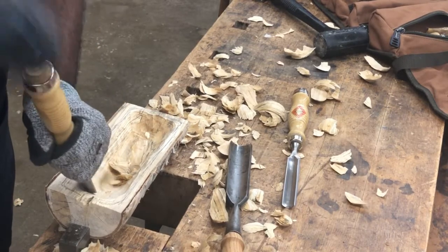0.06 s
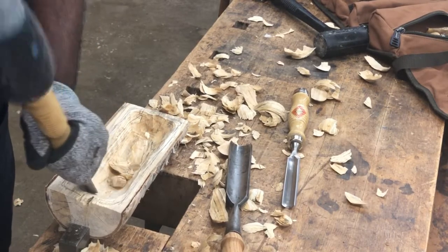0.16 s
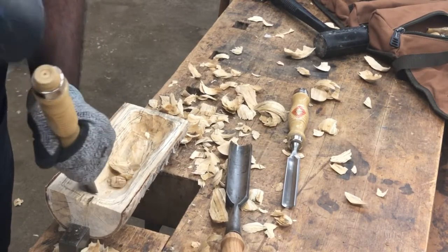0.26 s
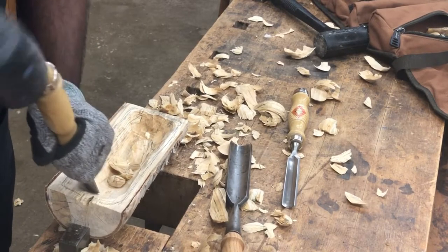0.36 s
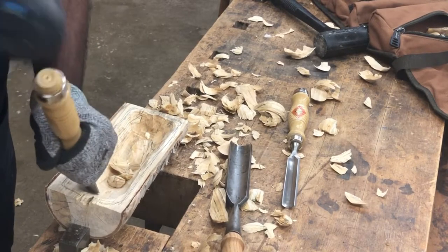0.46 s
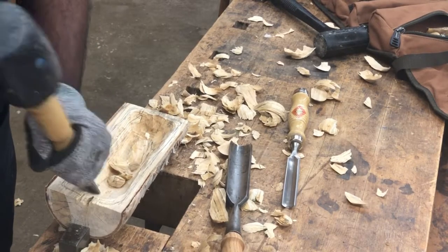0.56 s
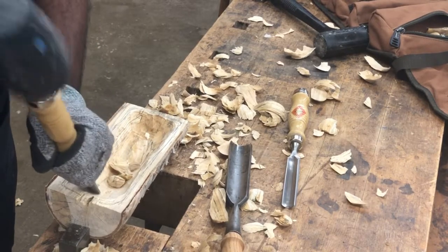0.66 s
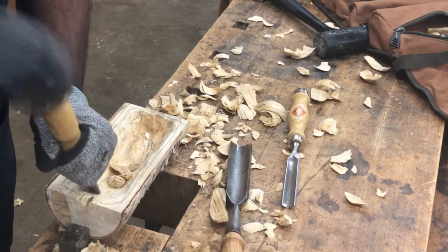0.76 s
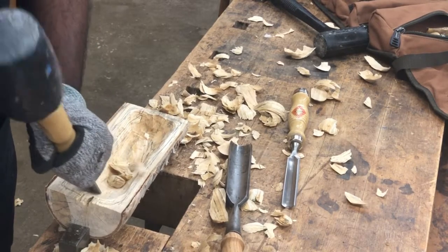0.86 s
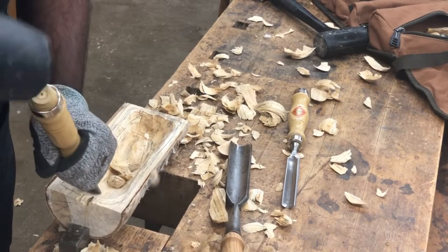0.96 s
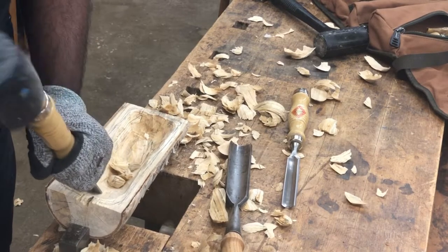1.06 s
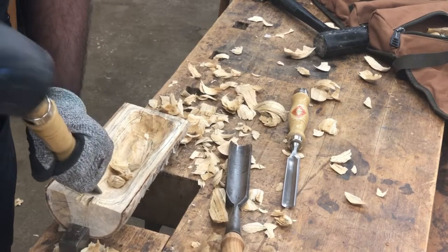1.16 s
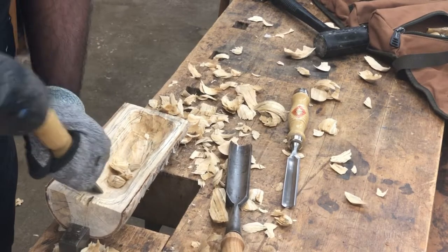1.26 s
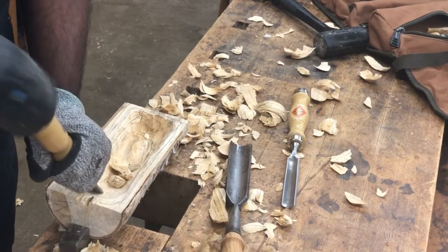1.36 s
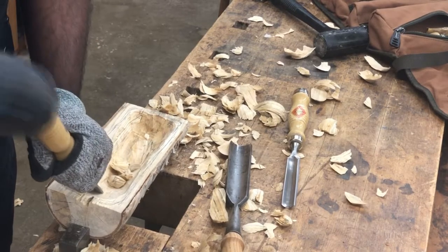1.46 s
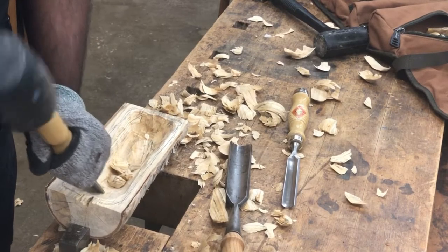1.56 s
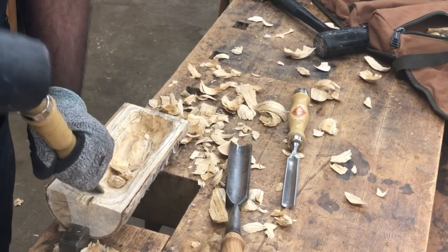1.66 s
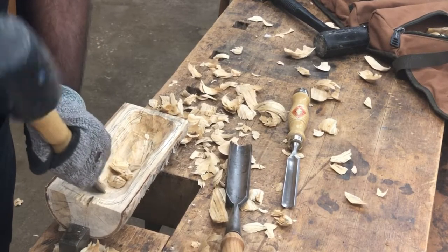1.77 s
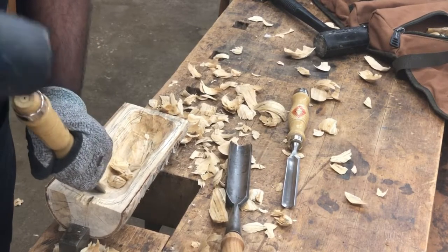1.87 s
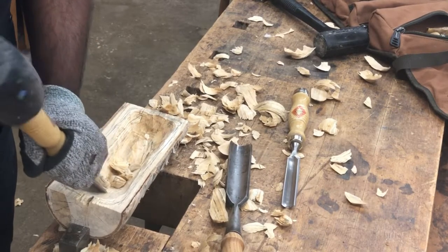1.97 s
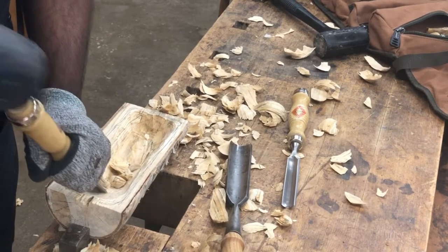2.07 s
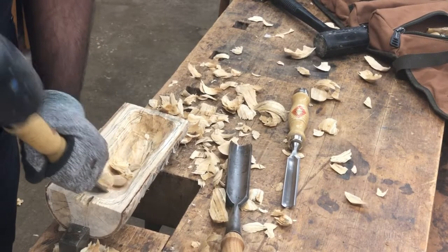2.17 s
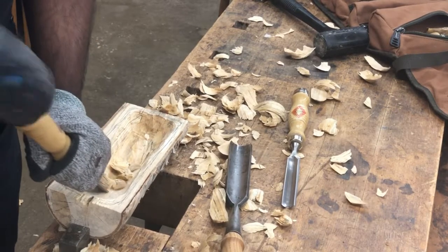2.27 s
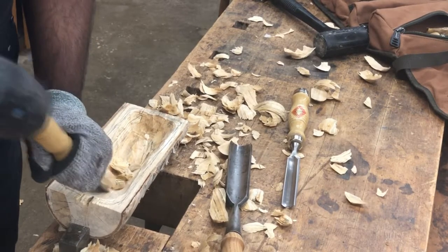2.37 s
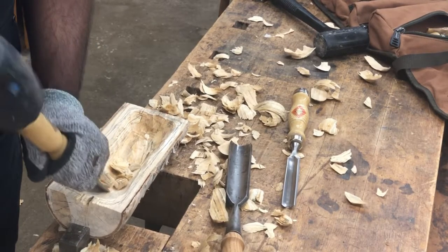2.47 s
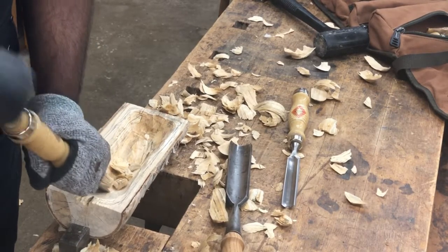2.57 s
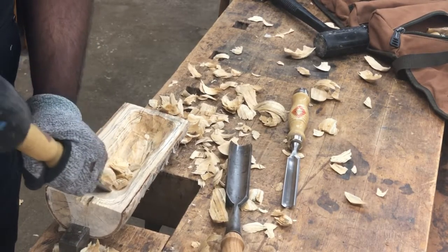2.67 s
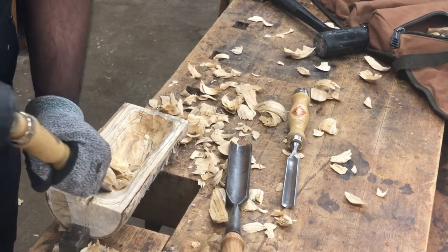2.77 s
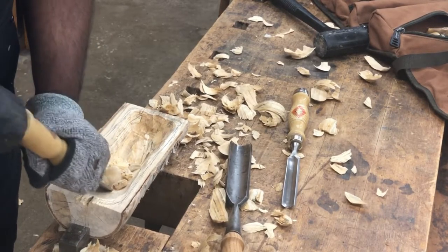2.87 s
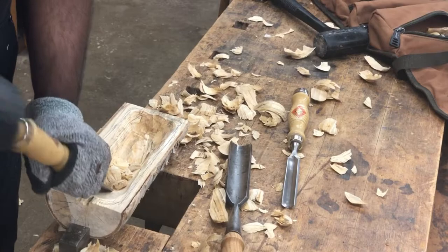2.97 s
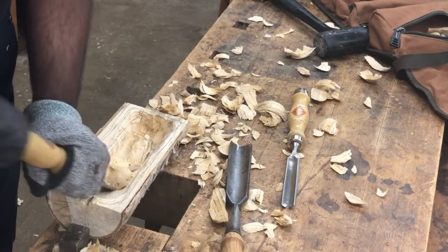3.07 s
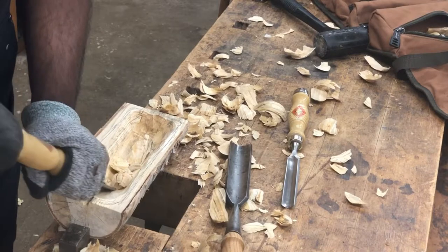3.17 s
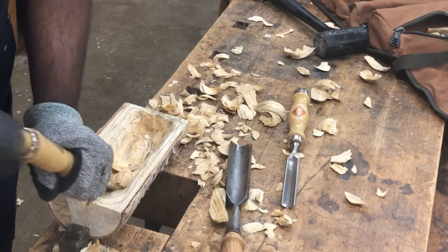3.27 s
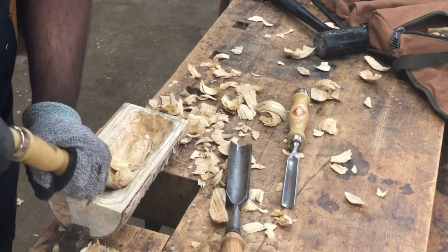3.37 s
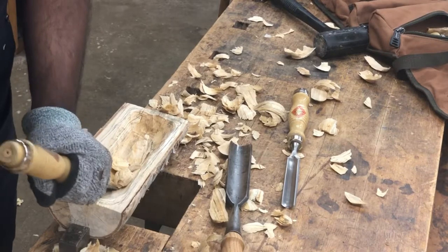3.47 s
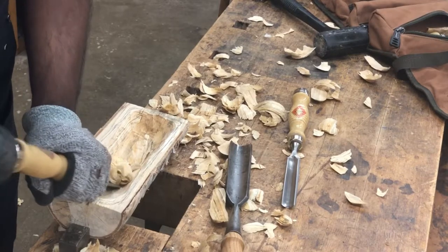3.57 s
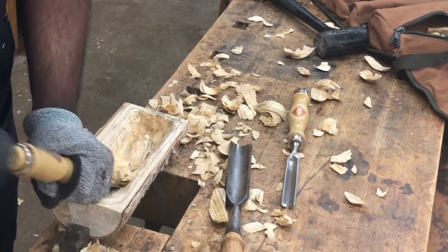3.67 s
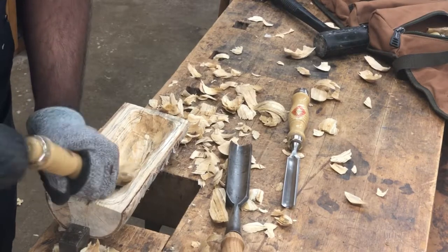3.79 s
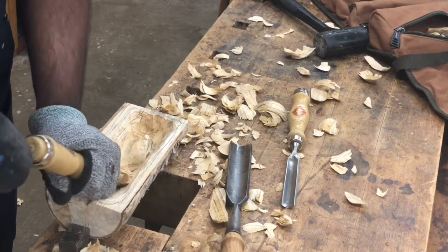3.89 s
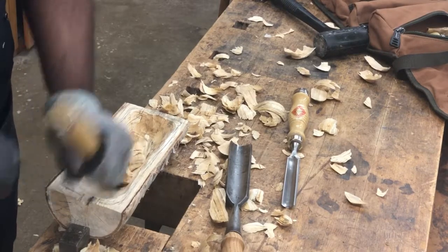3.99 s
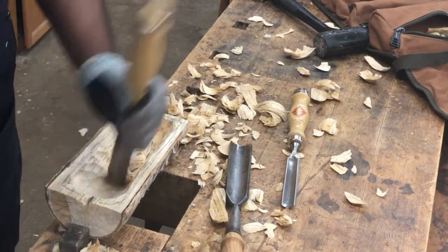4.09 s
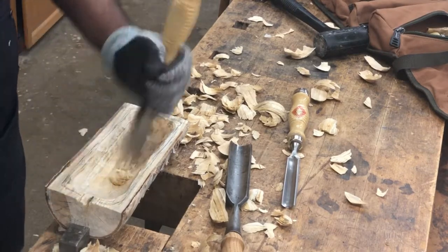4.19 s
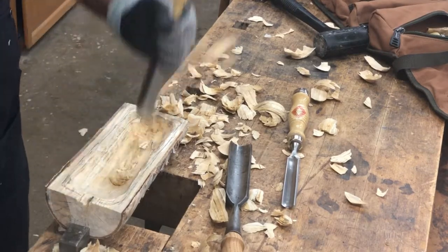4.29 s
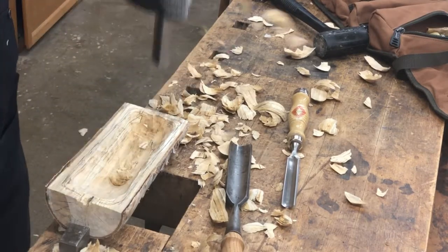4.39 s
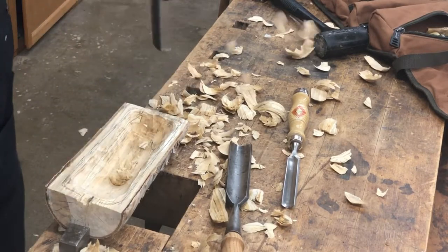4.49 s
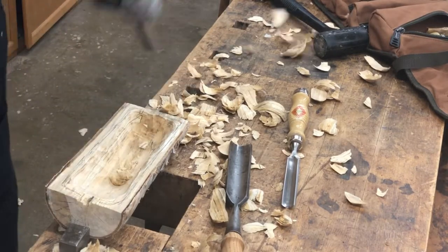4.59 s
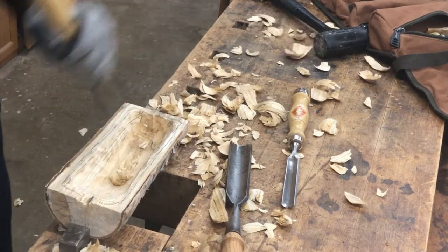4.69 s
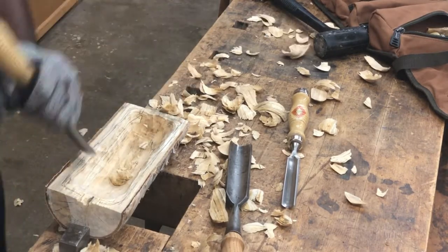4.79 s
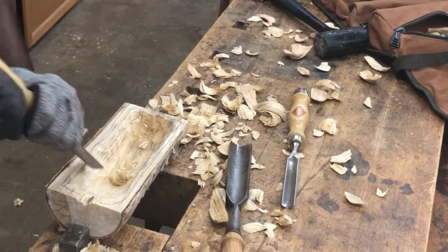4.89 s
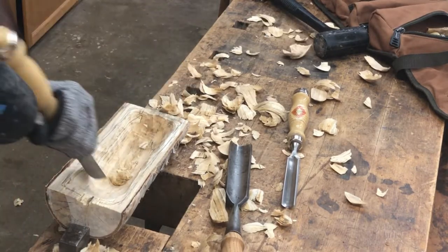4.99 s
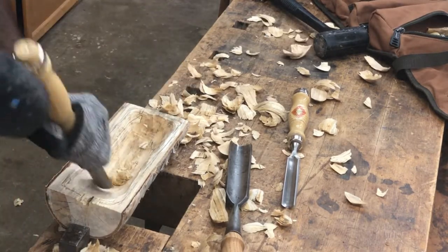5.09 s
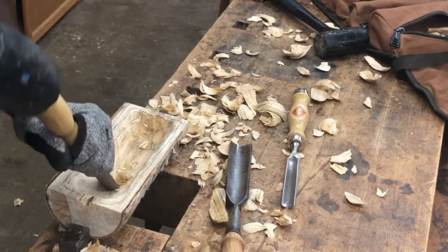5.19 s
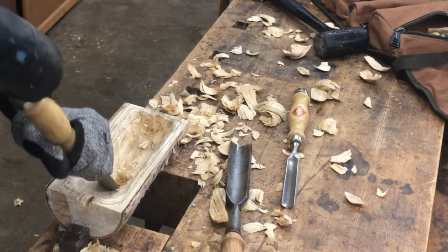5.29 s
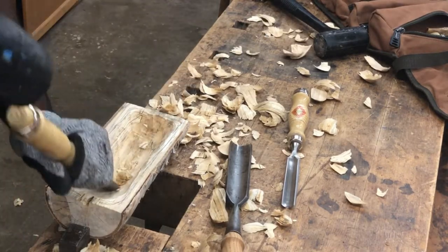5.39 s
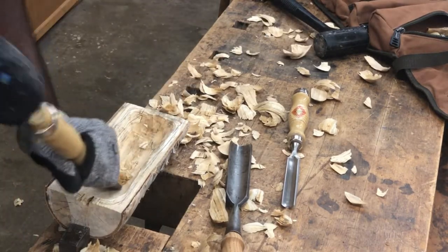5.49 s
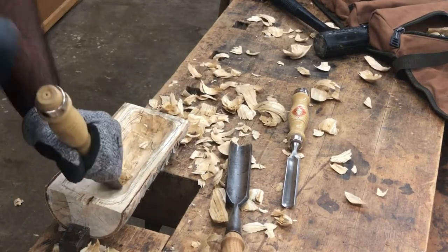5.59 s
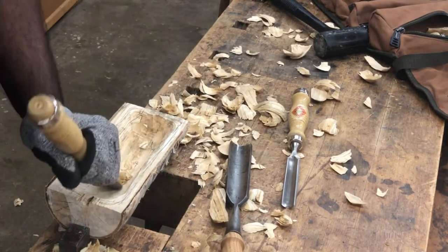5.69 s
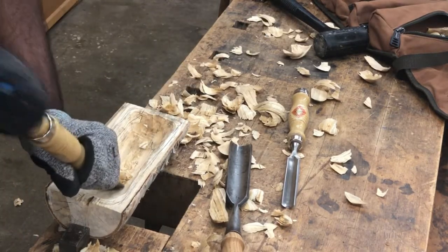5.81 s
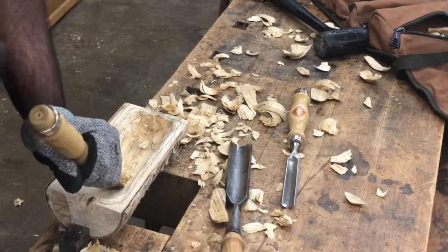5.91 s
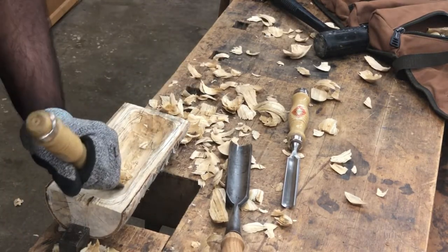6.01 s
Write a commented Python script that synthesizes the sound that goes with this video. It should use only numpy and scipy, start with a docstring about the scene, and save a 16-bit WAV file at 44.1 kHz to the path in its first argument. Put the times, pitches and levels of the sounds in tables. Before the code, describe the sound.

Hard, dry wood knocks in a steady fast run, each with a clattering bench thud, then splintering wood, small patters and a single softer tap.

```python
"""Gouging a log on a workbench

A mallet drives a wooden-handled gouge into a half-hollowed log, about four blows a second.
Each blow rings handle, log and steel modes; the log hops and lands (modes plus noise bands), the bench booms.
Then noise crackle tears a chip loose and flicks it away, the gouge is set again, one lighter blow follows.
Filtered noise and hum form the workshop's air, decaying noise its echo; faint high tones waver above."""
import sys
import numpy as np
from scipy import signal
from scipy.fft import rfft, irfft
from scipy.io import wavfile

SR = 44100
rng = np.random.default_rng(int(sys.argv[2]) if len(sys.argv) > 2 else 0)


def store_wav(level_fs):
    """Save 16-bit WAV to argv[1]."""
    pcm = np.round(np.clip(np.atleast_2d(level_fs), -1, 1) * 32767)
    wavfile.write(sys.argv[1], SR, pcm.T.astype(np.int16))


N = 266805
T = np.arange(int(0.45 * SR)) / SR  # s, longest single sound


def undb(db):
    """Decibels to gain."""
    return 10 ** (np.asarray(db) / 20)


def rms(x, size):
    """RMS of the first samples."""
    return np.sqrt(np.mean(x[:size] ** 2))


def level(x, size):
    """Scale to RMS 1 over the first samples."""
    return x / rms(x, size)


def add(track, start_s, x):
    """Mix a sound into the track, cut at both ends of the track."""
    i = int(round(start_s * SR))
    x = x[max(-i, 0):max(N - i, 0)]
    track[max(i, 0):max(i, 0) + len(x)] += x


def fade(t60_s):
    """Exponential decay, 60 dB in t60_s."""
    return np.exp(-np.log(1000) * T / t60_s)


def ring(modes, tune=1.0, rise_cycles=0.12, size=len(T)):
    """Decaying sine modes; each needs some cycles to build up."""
    t = T[:size]
    out = 0
    for hz, db, t60_s in modes:
        decay = undb(db - 60 * t / t60_s)
        rise = -np.expm1(-t * hz / rise_cycles)
        out = out + decay * rise * np.sin(2 * np.pi * hz * tune * t)
    return out


def regrip(modes, spread, scatter_db):
    """Grip and contact point change from blow to blow, and with them mode pitches and levels."""
    chance = rng.standard_normal((len(modes), 2))
    return [(hz * (1 + spread * a), db + scatter_db * b, t60_s)
            for (hz, db, t60_s), (a, b) in zip(modes, chance)]


def dense(table, size=len(T)):
    """Countless overlapping modes: third-octave noise bands, each with its own energy and decay."""
    hz, db, t60_s = np.transpose(table)
    log_hz = np.log(hz)
    out = 0
    for centre_hz in 40 * 2 ** (np.arange(27) / 3):
        log_centre = np.log(centre_hz)
        b, a = signal.iirpeak(centre_hz, 2.8, fs=SR)
        decay = fade(np.interp(log_centre, log_hz, t60_s))[:size]
        excitation = rng.standard_normal(size) * decay
        band = signal.lfilter(b, a, signal.lfilter(b, a, excitation))
        bass_rolloff = min(centre_hz / hz[0], 1) ** 2
        gain = undb(np.interp(log_centre, log_hz, db)) * bass_rolloff
        # band energy ~ bandwidth, so table levels are per Hz
        out = out + band * gain * np.sqrt(centre_hz / np.sum(band ** 2))
    return out * np.minimum(np.linspace(10, 0, size), 1)  # fade the last tenth


# steady air spectrum: f/Hz, relative level/dB per Hz
AIR = [(20, -35), (50, 3.5), (140, -2), (250, 0), (450, -1.5), (620, -9.5), (930, -16), (1080, -12.5),
       (1600, -14.5), (2300, -20.5), (4000, -25), (7000, -35), (11000, -40.5), (15000, -38)]
# machine hum: f/Hz, RMS level/dB
HUM = [(419.9, -61), (748.3, -65.5)]
AIR_DB = -51


def air():
    """Steady workshop rumble from shaped noise, with faint machine-hum sines."""
    t, f = np.arange(N) / SR, np.fft.rfftfreq(N, 1 / SR)
    hz, db = np.transpose(AIR)
    spectrum = undb(np.interp(np.log(f + 1), np.log(hz), db))
    noise = irfft(rfft(rng.standard_normal(N)) * spectrum, N)
    hum = 0
    for hum_hz, hum_db in HUM:
        hum = hum + undb(hum_db) * np.sqrt(2) * np.sin(2 * np.pi * (hum_hz * t + rng.random()))
    return undb(AIR_DB) * level(noise, size=N) + hum


# gouge handle, before tuning to the blow: f/Hz, relative level/dB, t60/s
KNOCK_MODES = [(1105, 11, 0.017), (1230, -17, 0.03), (1450, 3.5, 0.014)]
# log, struck or landing: f/Hz, relative level/dB, t60/s
LOG_MODES = [(202, -15, 0.087), (303, -3, 0.028), (486, -1.5, 0.04), (626, 4.5, 0.028), (725, -18, 0.081),
             (830, -14.5, 0.05)]
# gouge steel, damped by wood and glove: f/Hz, relative level/dB, t60/s
STEEL_MODES = [(1800, 0, 0.019), (1936, 12.5, 0.0097), (2200, 16.5, 0.013), (2882, 4, 0.014),
               (3437, 8, 0.014), (3634, 4, 0.022), (4210, -21.5, 0.079), (4970, -3, 0.014),
               (6730, -16, 0.035), (7750, -6, 0.013), (7260, -17, 0.059)]
# mallet contact, noise bands: f/Hz, relative level/dB per Hz, t60/s
SNAP = [(795, -29, .012), (1930, 10, 0.026), (3480, 10.5, 0.003), (5070, -2.5, 0.041), (7350, 6, 0.004),
        (11200, -3, 0.017), (16100, -14.5, 0.011)]
KNOCK_HZ = 1075  # blow pitch that leaves the handle modes untuned
PUSH_S = 0.002392  # first touch to full push


def strike(knock_db, hz, ping_db, snap_db, size=3072):
    """The mallet ticks on the handle; a moment later its full weight drives the edge into the wood."""
    out, push = np.zeros(size), int(PUSH_S * SR)
    handle_modes = regrip(KNOCK_MODES, spread=0.0024, scatter_db=2.5)
    handle = ring(handle_modes, hz / KNOCK_HZ, rise_cycles=7.4, size=size - push // 4)
    log = ring(regrip(LOG_MODES, spread=0.017, scatter_db=9.0), rise_cycles=0.31, size=size - push)
    steel = ring(regrip(STEEL_MODES, spread=0.021, scatter_db=3.0), rise_cycles=7.6, size=size)
    tick = dense(SNAP, size=size) * fade(0.0059)[:size]
    bite = dense(SNAP, size=size) * -np.expm1(-T[:size] / 0.0013)
    bite = bite[:size - push // 2]
    out[push // 4:] -= undb(knock_db - 7.0) * level(handle, size=350)
    out[push:] += undb(knock_db - 4.5) * level(log, size=350)
    out += undb(ping_db) * level(steel, size=350)
    out += undb(snap_db) * level(tick, size=350)
    out[push // 2:] += undb(snap_db + 3.5) * level(bite, size=350)
    return out


# room echo, noise bands: f/Hz, relative level/dB per Hz, t60/s
ECHO = [(60, -17.0, 0.39), (268, -1.5, 0.56), (1010, -3, 0.36), (4030, -8, 0.42),
        (9000, -7, 0.27), (16200, -6.5, 0.064)]


def workshop(x):
    """Diffuse echo of walls and floor, building up a little after the direct sound."""
    echo = dense(ECHO) * -np.expm1(-T / 0.0031)
    return signal.fftconvolve(x, echo / np.sqrt(np.sum(echo ** 2)))[:N]


# workbench, before swell: f/Hz, relative level/dB, t60/s
BENCH_MODES = [(79.2, -34, 0.5), (105, 1.8, 0.14), (134.5, -12.5, 0.2), (183.1, -1.5, 0.2),
               (215.2, -15.5, 0.24), (234.6, -15.5, 0.28), (287.7, -5.5, 0.17), (308.7, -23.5, 0.32),
               (343, -7.5, 0.2), (371.5, -9.5, 0.18), (404, -9, 0.14), (448, -16, 0.22),
               (488.7, -12.5, 0.18), (525, -11.5, 0.16), (637, -11, 0.085), (693, -13, 0.14),
               (746, -13, 0.18), (944, -23, 0.13)]
# bench drumming as the gouge works along the log: t/s, gain at DRUM_HZ/dB
DRUMMING = [(0.06, 0), (0.55, 5.5), (1.7, 4.5), (2.15, -2), (3.8, -3.5), (5.76, -4)]
DRUM_HZ, DRUM_WIDTH_HZ = 184, 25


def boom(s, swell=1.25):
    """The heavy bench takes some hundredths of a second to swing up; successive modes alternate in sign."""
    modes = regrip(BENCH_MODES, spread=0.008, scatter_db=3.0)
    swings = np.array([(-1) ** k * ring([mode]) * T ** swell for k, mode in enumerate(modes)])
    mode_hz = np.array(modes)[:, 0]
    near_drum = np.exp(-((mode_hz - DRUM_HZ) / DRUM_WIDTH_HZ) ** 2)
    drive = undb(np.interp(s, *np.transpose(DRUMMING)) * near_drum)
    return drive @ swings / rms(swings.sum(axis=0), size=4000)


# bench top and loose objects, noise bands: f/Hz, relative level/dB per Hz, t60/s
BENCH_TOP = [(41.5, -24, .4), (96.5, 6.5, 0.4), (200, 6, 0.42), (400, 1, 0.6), (645, 4.5, 0.3),
             (955, 0, 0.27), (1460, -5, 0.37), (2230, -13, 0.32), (3970, -20, 0.33), (5570, -24.5, 0.27),
             (8140, -31, 0.23), (11900, -45, 0.21), (16000, -46, .17)]


def chatter(common):
    """Bench top and all that lies on it chatter: a shared noise response plus a fresh one."""
    return level(common + dense(BENCH_TOP), size=2200)


def scatter():
    """The snap scatters off nearby tools and walls: decaying noise above 6 kHz."""
    treble = signal.butter(2, 6000, "high", fs=SR, output="sos")
    noise = signal.sosfilt(treble, rng.standard_normal(len(T)))
    return level(noise, size=2200) * fade(0.18)


# log contact, noise bands: f/Hz, relative level/dB per Hz, t60/s
CLACK = [(99, 1, 0.13), (248, 8.5, 0.22), (497, 6.5, 0.054), (736, -4.5, 0.026), (970, -2, 0.065),
         (1510, -8, 0.064), (2860, -21.5, 0.027), (5900, -40.5, 0.13), (16000, -57, 0.045)]


def clack():
    """The log meets the bench, never quite on the same spot: log modes plus dense contact noise."""
    body = ring(regrip(LOG_MODES, spread=0.035, scatter_db=3.0), size=3072)
    contact = dense(CLACK, size=3072)
    return undb(-4.5) * (level(body, size=350) + level(contact, size=350))


# flat landing on the bench top: f/Hz, relative level/dB, t60/s
SLAP_MODES = [(675, -2.5, 0.033), (756, -0.5, 0.035), (1480, -12, .015), (2480, -13, 0.011)]


def slap():
    """The log comes down flat on the bench top, ringing a few short modes."""
    modes = regrip(SLAP_MODES, spread=0.035, scatter_db=2.0)
    return undb(-3.5) * level(ring(modes, rise_cycles=0.89, size=3072), size=350)


# blows: t/s, knock reference level/dB, knock tuning f/Hz, steel ping level/dB,
# contact snap reference level/dB, bench thud level/dB, landing's share of rebound energy/0-1
BLOWS = [(0.0571, -14, 1054, -28.5, -35, -23.5, 0.66), (0.2936, -12, 1033, -41, -30.5, -23.5, 0.52),
         (0.53, -10.5, 1046, -25.5, -30, -23.5, 0.44), (0.7561, -11.5, 1070, -30, -35, -23.5, 0.43),
         (0.9929, -15, 960, -33, -32, -23, 0.7), (1.2249, -10, 1080, -29.5, -28.5, -25, 0.43),
         (1.4636, -12, 1117, -24, -30.5, -24.5, 0.49), (1.6904, -12, 887, -24.5, -36.5, -24.5, 0.57),
         (1.9276, -12.5, 1050, -24, -32.5, -25, 0.22), (2.159, -14.5, 1040, -26, -35.5, -25.5, 0.7),
         (2.3812, -15, 1060, -28, -32.5, -23.5, 0.78), (2.6209, -13.5, 1077, -22, -31, -27, .96),
         (2.8405, -15, 1040, -27.5, -31.5, -25.5, 0.99), (3.0647, -13, 1080, -24, -29.5, -30, 0.05),
         (3.2952, -14.5, 1094, -24.5, -28, -26.5, 0), (3.5313, -11.5, 1076, -28, -27, -33.5, 0.05),
         (3.7722, -18, 1015, -27.5, -36, -24, 0.05), (5.76, -21, 1040, -33, -45, -36, 0.2)]
# gouge nudges the log: t/s, clack gain level/dB, bench gain level/dB
NUDGES = [(4.144, -52, -44.5), (4.202, -32, -61), (4.213, -38, -43.5), (4.237, -42.5, -53),
          (4.943, -62, -56), (5.058, -65, -62), (5.15, -58, -67)]
SHAKE_PER_KNOCK, SHAKE_PER_THUD = 0.68, 0.44  # dB/dB
CHATTER_DB, REBOUND_DB = -6.5, 8.5  # offsets from shake level
REBOUND_GROWTH = 1.374  # dB rebound per dB shake
HOP_S, HOP_SPREAD_S, LANDING_S = 0.032, 0.003, 0.0535  # after first touch


def carving():
    """Blows and nudges shake log and bench; rebound energy is split between a hop and a landing."""
    out, bench_top = np.zeros(N), dense(BENCH_TOP)
    for s, knock_db, hz, ping_db, snap_db, thud_db, share in BLOWS:
        add(out, s, strike(knock_db, hz, ping_db, snap_db))
        add(out, s + PUSH_S, undb(thud_db) * boom(s))
        shake_db = SHAKE_PER_KNOCK * knock_db + SHAKE_PER_THUD * thud_db
        add(out, s + 0.0066, undb(shake_db + CHATTER_DB) * chatter(bench_top))
        add(out, s + 0.0068, undb(snap_db - 17.0) * scatter())
        rebound = undb(REBOUND_GROWTH * shake_db + REBOUND_DB)
        hop_s = s + HOP_S + HOP_SPREAD_S * rng.standard_normal()
        add(out, hop_s, rebound * np.sqrt(1 - share) * clack())
        # squarer landings slap more
        add(out, s + LANDING_S, rebound * np.sqrt(share) * (clack() + share * slap()))
    for s, clack_db, bench_db in NUDGES:
        add(out, s, undb(clack_db) * clack())
        add(out, s, undb(bench_db) * boom(s))
    return out


# wavering tones: t/s, length/s, starting centre f/Hz, glide/(Hz/s), peak level/dB
WHISTLES = [(.92, 0.054, 13500, -4000, -70), (1.165, 0.045, 11000, -2000, -74),
            (2.998, 0.043, 12600, -6000, -76), (4.76, 0.38, 11900, 7000, -74), (5.36, .19, 14100, 0, -76)]
WAVER_HZ, WAVER_DEPTH_HZ = 6.5, 854


def whistles():
    """Faint high sines swell and fade, wavering about a steady or gliding centre."""
    out = np.zeros(N)
    for s, length_s, hz, glide, db in WHISTLES:
        pitch_hz = hz + glide * T + WAVER_DEPTH_HZ * np.cos(2 * np.pi * WAVER_HZ * T)
        swell = np.sqrt(np.abs(np.sin(np.pi * np.minimum(T / length_s, 1))))
        add(out, s, undb(db) * swell * np.sin(2 * np.pi * np.cumsum(pitch_hz) / SR))
    return out


# light rattles, wood groans, steel touches: t/s, f/Hz, width/Hz, level before decay/dB, t60/s
CLINKS = [(1.004, 2390, 14, -39, 0.2), (1.024, 2220, 6.9, -28.5, 0.17), (1.024, 3300, 210, -35, .09),
          (4.211, 260, 39, -30, 0.13), (4.255, 178, 10, -35.5, 0.3), (4.25, 12000, 350, -62, 0.14),
          (4.262, 3400, 370, -55, 0.12), (4.262, 2260, 250, -54.5, 0.13), (4.713, 6940, 3200, -56, 0.15),
          (4.715, 900, 560, -49.5, 0.093), (4.942, 4480, 600, -51, 0.13), (4.945, 215, 28, -42, 0.21),
          (5.071, 210, 10, -45, 0.51), (5.105, 12300, 200, -68, .2)]


def clinks():
    """Rattles, groans of wood and touches of steel: decaying noise through single resonances."""
    out = np.zeros(N)
    for s, hz, width_hz, db, t60_s in CLINKS:
        b, a = signal.iirpeak(hz, hz / width_hz, fs=SR)
        rattle = signal.lfilter(b, a, rng.standard_normal(len(T)))
        add(out, s, undb(db) * level(rattle, size=2000) * fade(t60_s))
    return out


# wood fibres, noise bands: f/Hz, relative level/dB per Hz, t60/s
FIBRES = [(300, -3, 0.017), (1210, -6, 0.02), (2200, -1.5, 0.0098), (3800, 5, 0.0065), (5360, -6, 0.0028),
          (7900, 2, 0.0011), (12000, -4.5, 0.0011), (16000, -3.5, 0.001)]
# fibre snaps and pattering chips: t/s, peak level/dB
CHIPS = [(4.1072, -38), (4.1102, -28.5), (4.3665, -56), (4.4266, -55), (4.4504, -38), (4.4674, -44),
         (4.4855, -39), (4.5251, -43), (4.5624, -49), (4.627, -44), (4.7127, -52)]


def chips():
    """Single fibres snap and chips patter down: short dense noise ticks."""
    out = np.zeros(N)
    for s, db in CHIPS:
        tick = dense(FIBRES, size=1024)
        add(out, s, undb(db) * tick / np.abs(tick).max())
    return out


def crackle(rate_hz=700, scatter_db=1.5):
    """One bundle of fibres breaking: random impulses, many small and a few large, ring the fibres."""
    hits = (rng.random(N) < rate_hz / SR) * rng.standard_normal(N)
    sizes = undb(scatter_db * np.minimum(rng.exponential(size=N), 5))
    return signal.oaconvolve(hits * sizes, dense(FIBRES, size=1024))[:N]


PULL_ATTACK_S, PULL_SWELL_DB, PULL_T60_S = 0.003, 11, 0.026


def pull(length_s):
    """Strain builds while the edge pulls at the chip and decays once the fibres give way."""
    attack = np.minimum(T / PULL_ATTACK_S, 1)
    swell = undb(PULL_SWELL_DB * np.minimum(T / length_s - 1, 0))
    release = np.exp(-np.log(1000) * np.maximum(T - length_s, 0) / PULL_T60_S)
    return attack * swell * release


# pulls that tear the chip and scrape free: t/s, length/s, level as it gives way/dB
PULLS = [(4.128, 0.02, -37), (4.159, 0.0406, -34.5), (4.24, 0.04, -54)]
SHAVINGS_S, SHAVINGS_DB, SHAVINGS_T60_S = 4.449, -58, 0.88  # decay cut off with T


def tearing():
    """Crackle of breaking fibres follows each pull; the flicked chip then stirs loose shavings."""
    strain = np.zeros(N)
    for s, length_s, db in PULLS:
        add(strain, s, undb(db) * pull(length_s))
    add(strain, SHAVINGS_S, undb(SHAVINGS_DB) * fade(SHAVINGS_T60_S))
    return strain * level(sum(crackle() for _ in range(5)), size=N)


def scene():
    """Everything on the bench, its echo, the room's air and the high tones."""
    work = carving() + clinks() + chips() + tearing()
    return (work + undb(-19) * workshop(work) + air() + whistles())[None]


CEILING, TOP_HZ = 0.68, 16000  # peak limit (full scale 1), upper band edge


def record(dry):
    """The microphone loses the deepest bass and the very top, and rounds off the hardest peaks."""
    x = signal.sosfilt(signal.butter(3, 62, "high", fs=SR, output="sos"), dry)
    x = x / (1 + (x / CEILING) ** 6) ** (1 / 6)
    return signal.sosfilt(signal.ellip(8, 0.2, 70, TOP_HZ, fs=SR, output="sos"), x)


dry = scene()
out = record(dry)
store_wav(out)
```